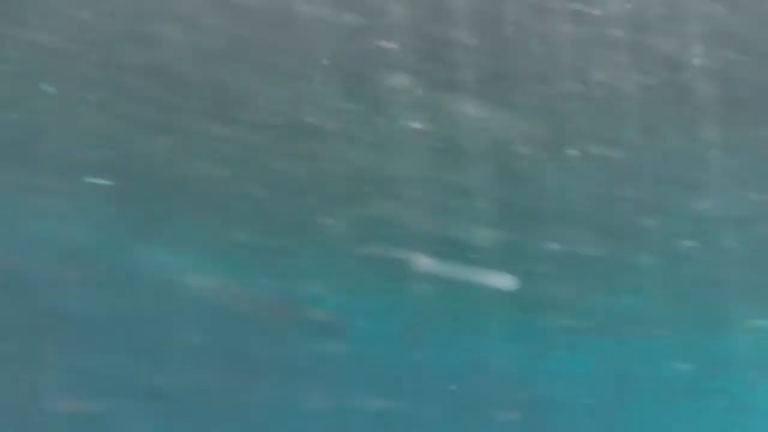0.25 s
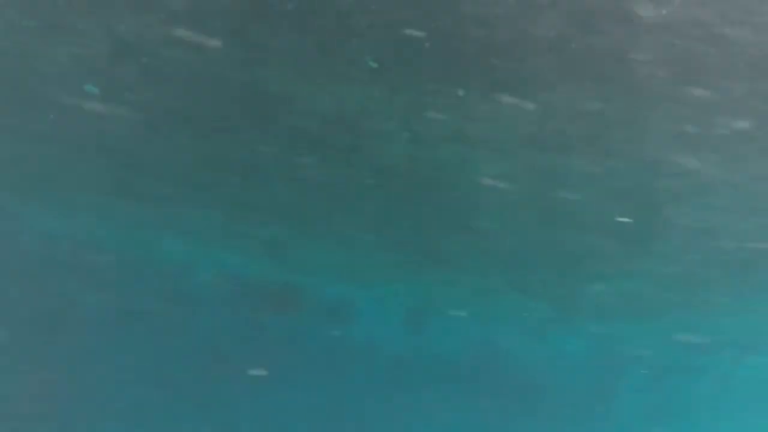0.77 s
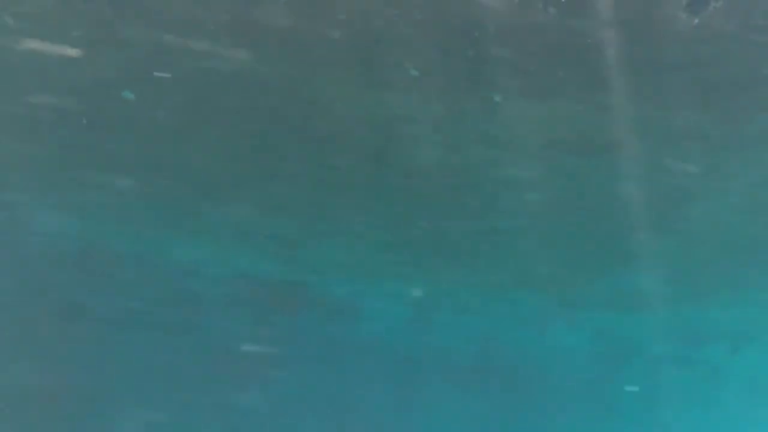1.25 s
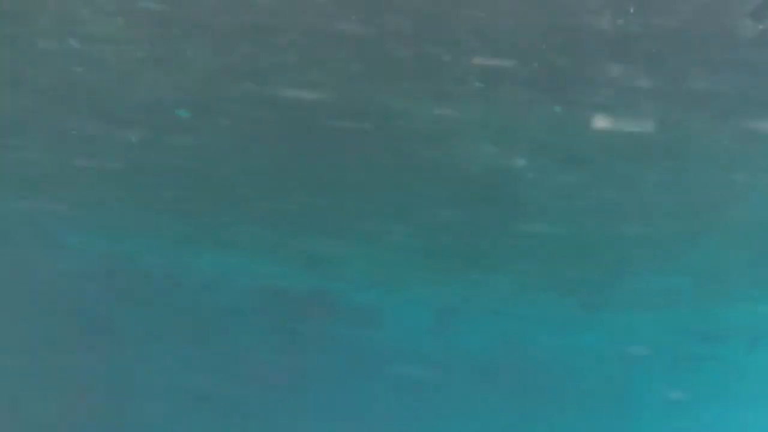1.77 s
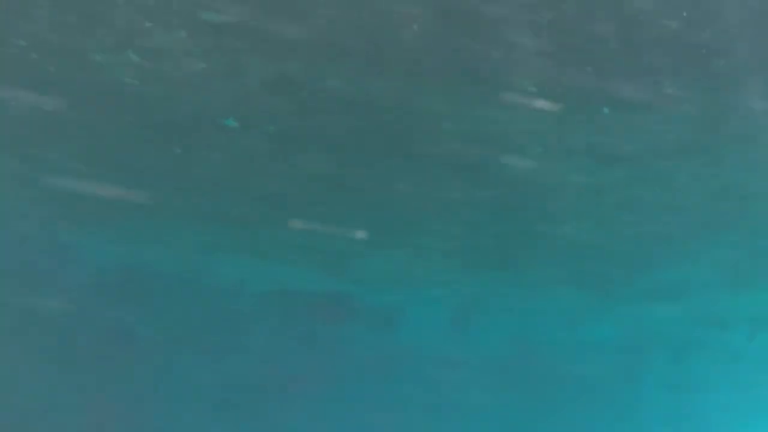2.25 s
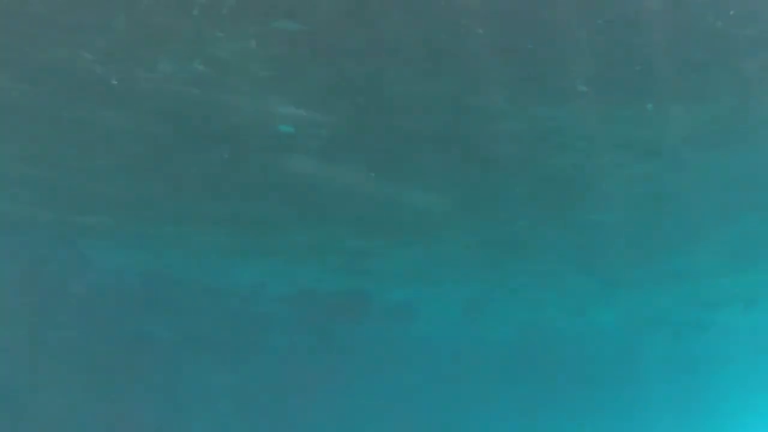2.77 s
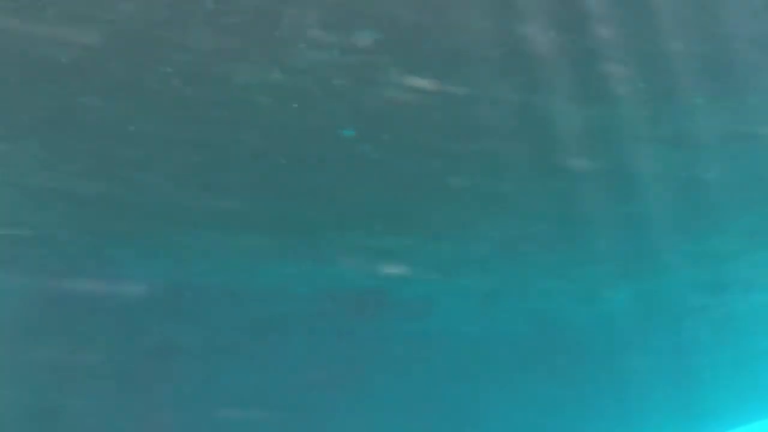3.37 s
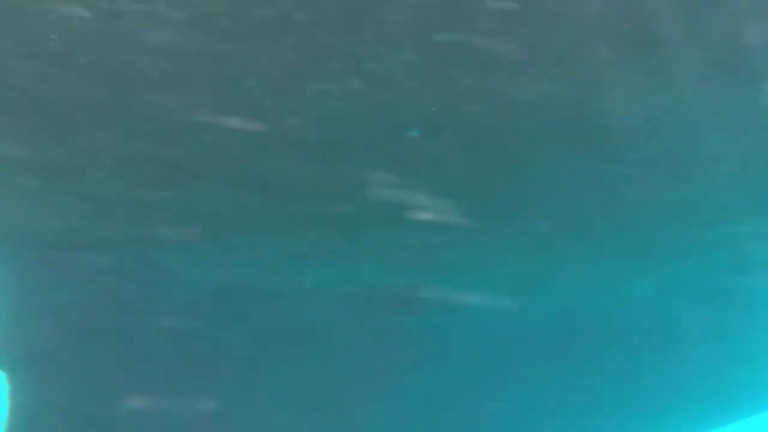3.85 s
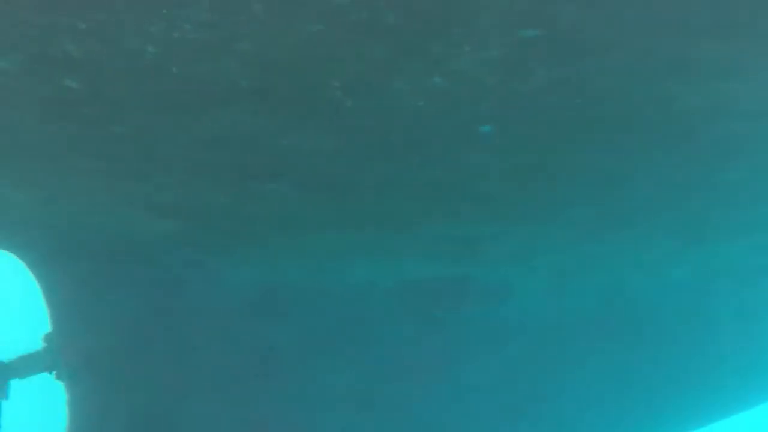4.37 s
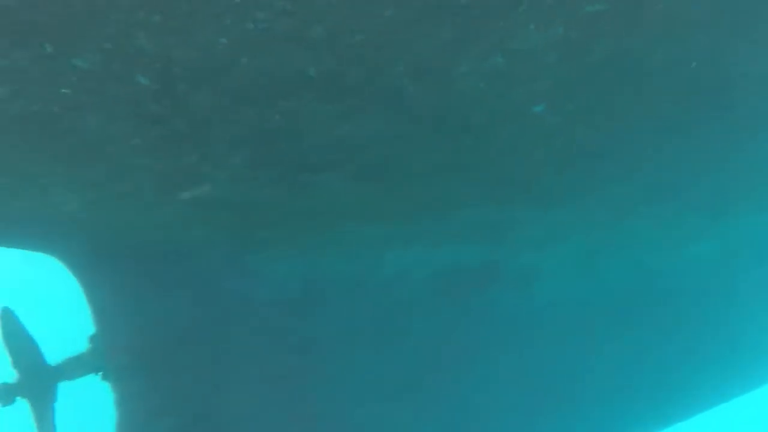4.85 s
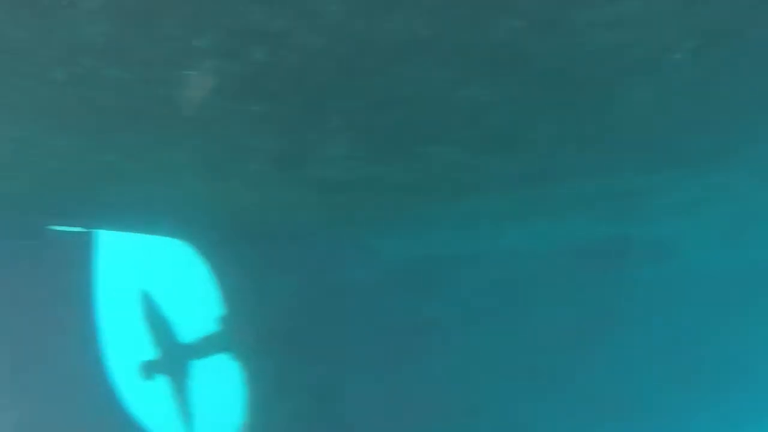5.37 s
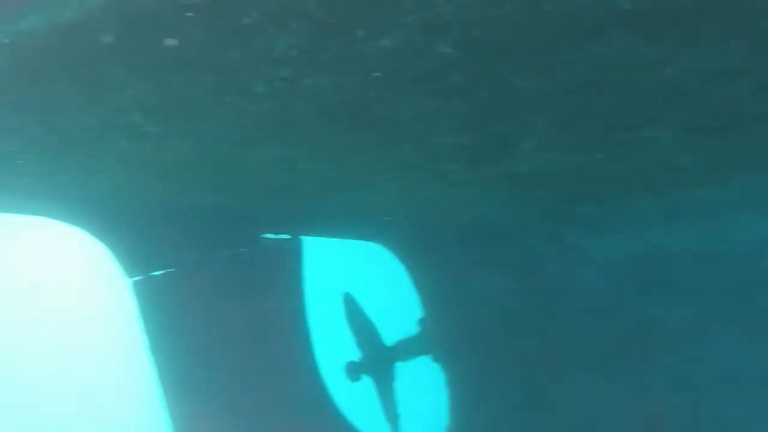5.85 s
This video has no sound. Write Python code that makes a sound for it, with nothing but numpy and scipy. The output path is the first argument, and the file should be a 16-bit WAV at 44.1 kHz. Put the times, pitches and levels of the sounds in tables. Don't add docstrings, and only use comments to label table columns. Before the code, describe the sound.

Underwater beside a boat hull, a sealed microphone picks up an idling engine as a fast, hollow, midrange clatter with uneven harder clanks. Low water booms and soft thuds press on the shell, with faint grit ticks and a thin distant pump whine. A hard knock with a brief rattle comes at 0.8 seconds; a louder clipped group at about 5.1 to 5.4. The sound dips after the knocks and then recovers.

```python
import sys
import numpy as np
from scipy import signal
from scipy.fft import rfft, irfft, next_fast_len
from scipy.io import wavfile
from scipy.ndimage import uniform_filter1d

SR = 44100
rng = np.random.default_rng(int(sys.argv[2]) if len(sys.argv) > 2 else 0)


def dump_mix(stems):
    frames = np.atleast_2d(stems).T
    limited = np.clip(frames, -1, 1)
    pcm = np.round(limited * 32767).astype(np.int16)
    wavfile.write(sys.argv[1], SR, pcm)


def gain_from_db(level_db):
    decades = np.asarray(level_db, float) / 20
    return 10 ** decades


N = 269010
TIME = np.arange(N) / SR

# freq_hz, density_db (per Hz)
HISS_SPECTRUM = [(300, -62.5), (900, -12), (1500, 1.5), (2100, -3), (3200, -3), (4200, -10), (4850, -19),
                 (5500, -11.5), (6300, -7.5), (10000, -8.5), (14900, -11), (15250, -14.5), (15500, -63)]
# time_s, pitch_hz, level_db
PUMP_WHINE = [(0, 1160, -51.5), (.4, 1143, -51), (1.0, 1165, -56.5), (1.5, 1170, -54), (1.8, 1150, -51),
              (2.2, 1147, -45), (2.6, 1153, -53.5), (3.0, 1160, -51.5), (3.5, 1140, -44),
              (3.95, 1155, -51.5), (4.1, 1170, -50.5), (4.5, 1160, -56.5), (4.95, 1147, -49),
              (5.3, 1160, -57.5), (5.6, 1163, -53.5), (6.1, 1148, -55)]
# time_s, surge_db
SWAY = [(0.0, -31.5), (1.02, -41), (1.29, -35), (1.38, -45.5), (1.53, -26.5), (1.6, -39.5), (3.36, -31.5),
        (3.58, -38), (4.89, -29), (4.93, -35.5), (5.84, -30.5), (5.88, -45), (5.95, -37), (6.1, -38)]
# freq_hz, density_db (per Hz)
SURGE_SPECTRUM = [(8, -40), (22, 4.5), (30, 9.5), (55, 8), (80, -11), (150, -50), (600, -110)]
BOOM_SPECTRUM = [(10, -51.5), (30, -27), (60, -2), (78, 15), (90, 11.5), (105, 9), (125, 3.5), (200, -52.5),
                 (800, -110)]
GURGLE_SPECTRUM = [(20, -61), (60, -25.5), (130, 2), (180, -2.5), (260, -14.5), (600, -27), (1500, -60),
                   (4000, -110)]
# time_s, peak_db, boom_hz, slap_db
THUDS = [(0.003, -19.5, 78.7, -53), (0.158, -14, 90.5, -30), (0.46, -13.5, 92.6, -23),
         (1.014, -22, 101.5, -40), (1.371, -20.5, 94, -43.5), (1.619, -14.5, 93, -25),
         (1.973, -18.5, 90.7, -50), (2.057, -16.5, 85.4, -29), (2.325, -21.5, 103.4, -44),
         (2.38, -24, 84.3, -28), (2.421, -17, 83.7, -28), (2.69, -20, 103.5, -42.5),
         (3.12, -19.5, 92.3, -43), (3.278, -19, 107, -29.5), (3.573, -17.5, 91.7, -40),
         (3.861, -15, 100.5, -29.5), (3.968, -15.5, 90.5, -49), (4.102, -16, 94, -32),
         (4.251, -19, 87.7, -35), (4.365, -19.5, 88.3, -37), (4.529, -17.5, 86.4, -27),
         (4.762, -18, 100, -42), (4.877, -21, 95, -40.5), (4.969, -20.5, 85, -28), (5.35, -21.5, 83.5, -32),
         (5.428, -18.5, 67.3, -36), (5.539, -17.5, 95, -44), (5.7, -26.5, 93.5, -32),
         (5.772, -20.5, 84.5, -35), (5.871, -23.5, 87, -36)]
# start_s, bright_peak_db, dull_peak_db, hollow (0-1)
TICKS = [(0.0186, -38, -44, 0.1), (0.0394, -47, -51, 0), (0.0882, -49.5, -59, 0), (0.5804, -53, -59, 0),
         (0.6522, -47, -51, 0.05), (1.5925, -51.5, -48.5, 0.4), (2.3555, -36, -41, 0.1),
         (2.378, -43, -61, 0), (2.5626, -36, -39, 0.1), (2.8387, -43.5, -60, .2), (3.1714, -47.5, -55, .3),
         (3.233, -51, -52, 0.1), (4.082, -43.5, -57, 0), (4.485, -46, -63, 0.07),
         (4.6036, -37.5, -42.5, 0.9), (4.618, -46, -51, .4), (4.7985, -48, -44, 0.4),
         (4.819, -56, -48, 0.2), (4.842, -48, -44.5, 0), (5.536, -51, -57, .2), (5.843, -46, -57.5, .6),
         (5.8554, -47, -64, .3), (6.0008, -47, -66, .7)]
# freq_hz, density_db (per Hz)
TICK_BRIGHT = [(2500, -67.5), (4500, -22.5), (5300, 1.5), (6200, 7), (7300, 1), (9000, -12), (14000, -61.5)]
TICK_MIDDLE = [(1200, -57.5), (2400, -15.5), (2900, 0.5), (3400, 0), (4200, -12.5), (5500, -49)]
TICK_DULL = [(400, -53.5), (1000, -7), (1400, 4.5), (2000, -14), (2600, -14.5), (4500, -60.5)]
# start_s, push (+1 in, -1 out), peak_db, ring_hz, swell_ms
KNOCKS = [(.78783, 1, 4, 522, 1.6), (.7919, 1, -1, 540, .7), (.7935, -1, -8, 960, 4),
          (.792, 1, -19, 240, 10), (.815, 1, -22, 165, 18), (5.06182, 1, 11.5, 695, .8),
          (5.0608, -1, -10, 450, .8), (5.0647, -1, -4, 760, .75), (5.067, 1, -13, 620, 1.6),
          (5.18345, 1, 1.8, 740, 1.), (5.1862, -1, -11, 700, .9), (5.199, -1, -8, 84, 14),
          (5.2, -1, -9, 290, 4), (5.203, 1, -17, 170, 14), (5.3685, 1, -8, 400, 2.2)]
# start_s, level_db, decay_ms
RATTLES = [(0.797, -2, 49), (5.065, -16.5, 4.7), (5.186, -15.5, 6), (5.198, 0.5, 7.7), (5.37, -19.5, 14),
           (1.641, -15, 40)]
# start_s, drop_db
DUCKS = [
    (0.795, -10.5),
    (5.0641, -9.5),
    (5.19, -3),
]
# time_s, knock_peak_db
LOAD = [(0, -12), (.7, -11), (1.15, -16), (1.9, -10), (2.2, -11.5), (2.7, -12.5), (3.7, -10), (3.95, -15),
        (4.6, -27), (4.9, -12.5), (5.2, -21.5), (5.6, -16.5), (5.8, -16), (6.1, -9.5)]
# start_s, peak_db, ring_hz
CLANKS = [(0.084, -11.5, 560), (0.196, -15.5, 583), (0.254, -13, 556), (0.428, -13.5, 442),
          (0.51, -11.5, 519), (1.428, -15, 548), (1.582, -13, 545), (1.62, -15, 573), (1.966, -13, 494),
          (2.047, -19, 560), (2.079, -10, 530), (2.309, -11, 566), (2.725, -8.5, 560), (2.768, -8.5, 542),
          (2.811, -14.5, 568), (2.995, -16, 565), (3.506, -12.5, 544), (4.044, -14.5, 500),
          (4.086, -12.5, 550), (4.255, -12, 543), (4.374, -9.5, 536), (4.532, -11, 545), (4.655, -17, 540),
          (4.84, -11.5, 522), (5.02, -14, 597), (5.402, -13.5, 540), (5.623, -14.5, 460),
          (5.67, -16.5, 562), (5.729, -15.5, 567), (6.075, -17.5, 560)]
CYLINDERS_DB = [-9, -19.5, -8.5, -10.5]
# centre_hz, width_hz, level_db
HOUSING = [(268.4, 14, -20.5), (330, 20, -15), (415, 26, -9.5), (474.4, 18.5, -2), (521.7, 30, -8),
           (551.2, 15.5, 1), (579, 26, -6), (636.6, 35, -12.5), (744, 143, -18.5), (915, 90, -18.5)]
# freq_hz, density_db (per Hz)
PASSAGE = [(40, -75), (120, -42.5), (200, -29.5), (300, -19.5), (550, -7.5), (700, -21.5), (980, -19),
           (1100, -29), (1250, -40), (1450, -46.5), (2000, -71.5), (4000, -110)]

CYCLE_HZ = 5.844


def curves(table):
    s, *columns = np.transpose(table)
    return [np.interp(TIME, s, c) for c in columns]


def colour(x, points, modes=()):
    size = next_fast_len(N + SR // 2, real=True)
    hz = np.maximum(np.fft.rfftfreq(size, 1 / SR), 1)
    point_hz, point_db = np.transpose(points)
    power = gain_from_db(np.interp(np.log(hz), np.log(point_hz), point_db)) ** 2
    for centre_hz, width_hz, db in modes:
        power += gain_from_db(db) ** 2 / (1 + (2 * (hz - centre_hz) / width_hz) ** 4)
    cepstrum = irfft(np.log(power / power.mean()) / 2, size)
    cepstrum[1:size // 2] *= 2
    cepstrum[size // 2 + 1:] = 0
    return irfft(rfft(x, size) * np.exp(rfft(cepstrum)), size)[:N]


def noise():
    return rng.standard_normal(N)


def wander(per_s):
    span = int(SR / per_s)
    slow = uniform_filter1d(uniform_filter1d(noise(), span), span)
    return slow / slow.std()


def swell(start_s, rise_s):
    out = np.zeros(N)
    first = max(int(start_s * SR) + 1, 0)
    u = (TIME[first:first + int(20 * rise_s * SR)] - start_s) / rise_s
    out[first:first + len(u)] = u * np.exp(1 - u)
    return out


def ring(start_s, hz):
    return np.sin(2 * np.pi * hz * (TIME - start_s))


def hiss(level_db=-61):
    return gain_from_db(level_db) * colour(noise(), HISS_SPECTRUM)


def whine(flutter_db=2.5):
    hz, db = curves(PUMP_WHINE)
    level = gain_from_db(db + flutter_db * wander(29.0))
    return 2 ** .5 * level * np.sin(2 * np.pi * np.cumsum(hz) / SR)


def slosh(gurgle_follows=0.42, boom_flicker_db=0.87, gurgle_flicker_db=2.5):
    sway_db = curves(SWAY)[0]
    boom_db = -32.5 + boom_flicker_db * wander(2.8)
    gurgle_db = -39.5 + gurgle_follows * (sway_db - sway_db.mean()) + gurgle_flicker_db * wander(10.0)
    boom = gain_from_db(boom_db) * colour(noise(), BOOM_SPECTRUM)
    gurgle = gain_from_db(gurgle_db) * colour(noise(), GURGLE_SPECTRUM)
    surge = gain_from_db(sway_db + 2) * colour(noise(), SURGE_SPECTRUM)
    return boom + gurgle + surge


def thuds(boom_ms=20.5, boom_db=-2.5, slap_ms=12.0, early_s=0.012):
    boom = np.zeros(N)
    slap = np.zeros(N)
    for s, peak_db, hz, slap_db in THUDS:
        boom += gain_from_db(peak_db + boom_db) * swell(s - early_s, boom_ms / 1000) * ring(s, hz)
        slap += gain_from_db(slap_db) * swell(s - early_s, slap_ms / 1000)
    return boom + slap * colour(noise(), GURGLE_SPECTRUM)


def ticks(bright_db=-12.5, middle_db=-15.0, hollow_db=15, length_ms=2, sharpen=0.48):
    at, bright, dull, hollow = np.transpose(TICKS)
    lengths_ms = length_ms * gain_from_db(sharpen * (bright.mean() - bright))
    bands = ((bright + bright_db, TICK_BRIGHT),
             (dull + middle_db + hollow_db * hollow, TICK_MIDDLE),
             (dull, TICK_DULL))
    out = np.zeros(N)
    for levels_db, spectrum in bands:
        scratch = sum(gain_from_db(db) * swell(s, ms / 1000) for s, db, ms in zip(at, levels_db, lengths_ms))
        out += colour(noise() * scratch, spectrum)
    return out


def knocks():
    out = np.zeros(N)
    for s, push, db, hz, ms in KNOCKS:
        out += push * gain_from_db(db) * swell(s, ms / 1000) ** 2 * ring(s, hz)
    return out


def rattles():
    shake = np.zeros(N)
    for s, db, decay_ms in RATTLES:
        shake += gain_from_db(db) * (TIME > s) * np.exp(-np.abs(TIME - s) * 1000 / decay_ms)
    return noise() * shake


def clanks(first_s=.1235, slack_hz=536, ring_ms=4.63, ring_db=-1.5, scatter_db=-0.5, scatter_hz=12.):
    at = first_s + np.arange(int(N / SR * CYCLE_HZ)) / CYCLE_HZ
    chance = rng.standard_normal((len(at), 2))
    peaks_db = np.interp(at, *np.transpose(LOAD)) + scatter_db * chance[:, 0]
    slack = zip(at, peaks_db, slack_hz + scatter_hz * chance[:, 1])
    out = np.zeros(N)
    for s, db, hz in [*slack, *CLANKS]:
        out += gain_from_db(db + ring_db) * swell(s, ring_ms / 1000) ** 2 * ring(s, hz)
    return out


def engine(first_firing_s=.119, level_db=-22, burst_ms=4., burst_db=-5.5, strike_db=22.0,
           scatter_db=0.5, jitter_ms=1.5):
    count = int(N / SR * CYCLE_HZ * 4) + 3
    chance = rng.standard_normal((count, 2))
    k = np.arange(count) - 2
    at = (first_firing_s + k / (4 * CYCLE_HZ) + chance[:, 0] * jitter_ms / 1000) * SR
    keep = (at >= 0) & (at < N)
    strikes = gain_from_db(np.array(CYLINDERS_DB)[k % 4] + scatter_db * chance[:, 1])
    kicks = np.zeros(N)
    kicks[at[keep].astype(int)] = strikes[keep]
    burst = swell(0, burst_ms / 1000)[:SR // 10]
    push = 1 + gain_from_db(burst_db) * signal.fftconvolve(kicks, burst)[:N]
    churn = noise() * push / np.sqrt(np.mean(push ** 2))
    return (churn + gain_from_db(strike_db) * kicks) * gain_from_db(level_db)


def ducking(attack_s=0.0096, quick_s=0.17, slow_s=0.25, quick_share=0.18):
    gain_db = np.zeros(N)
    for s, db in DUCKS:
        t = np.maximum(TIME - s, 0)
        back = quick_share * np.exp(-t / quick_s) + (1 - quick_share) * np.exp(-t / slow_s)
        gain_db += db * (1 - np.exp(-t / attack_s)) * back
    return gain_from_db(gain_db)


def scene():
    housing = colour(engine() + rattles(), PASSAGE, HOUSING)
    heard = whine() + slosh() + thuds() + ticks() + knocks() + clanks()
    return (hiss() + housing + heard / ducking())[None]


def low_pass(x):
    return signal.sosfilt(signal.butter(12, 16280, fs=SR, output="sos"), x)


def record(dry):
    mix = np.clip(dry * ducking(), -1, 1)
    return low_pass(mix)


dry = scene()
out = record(dry)
dump_mix(out)
```